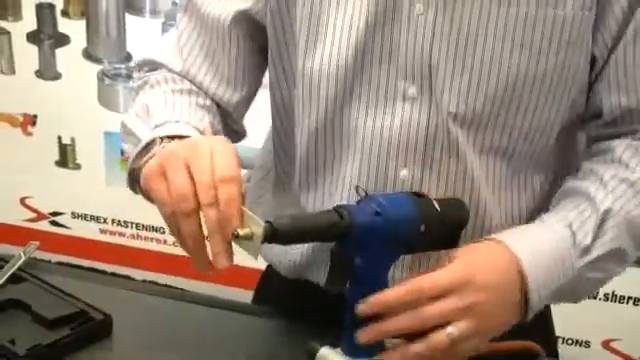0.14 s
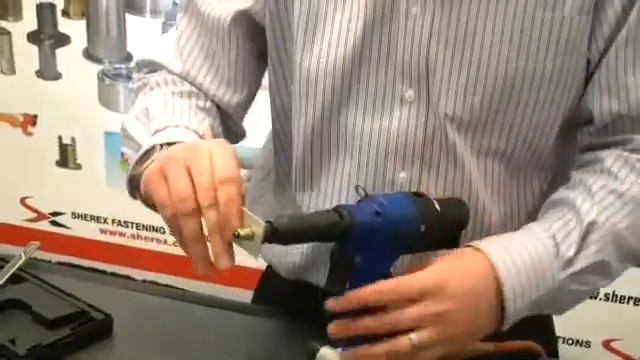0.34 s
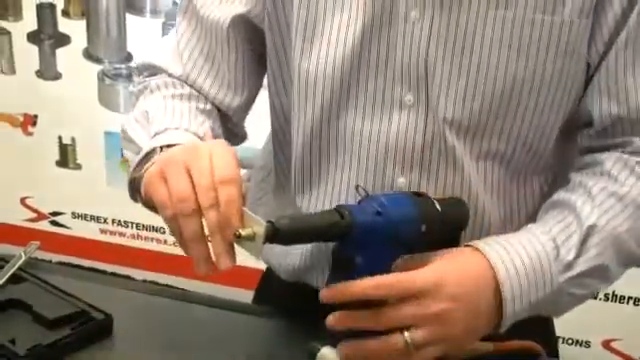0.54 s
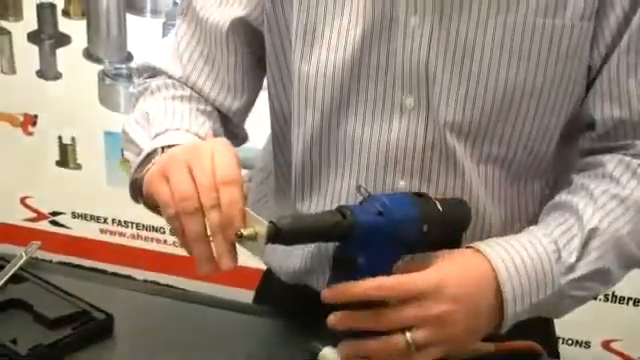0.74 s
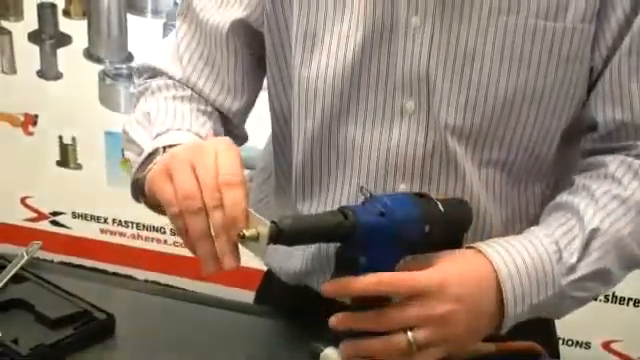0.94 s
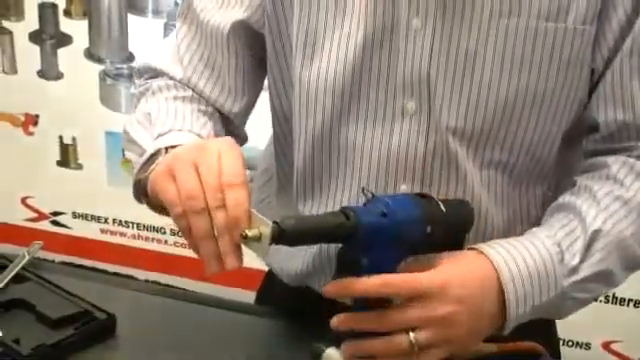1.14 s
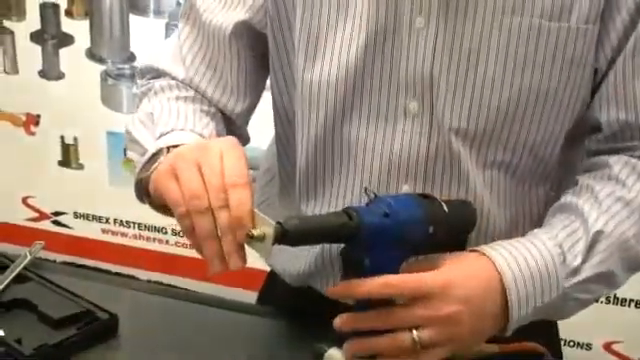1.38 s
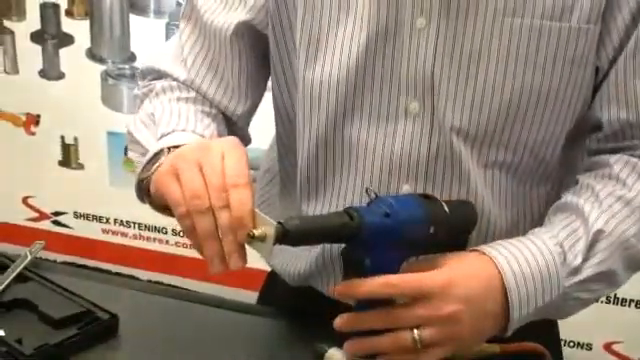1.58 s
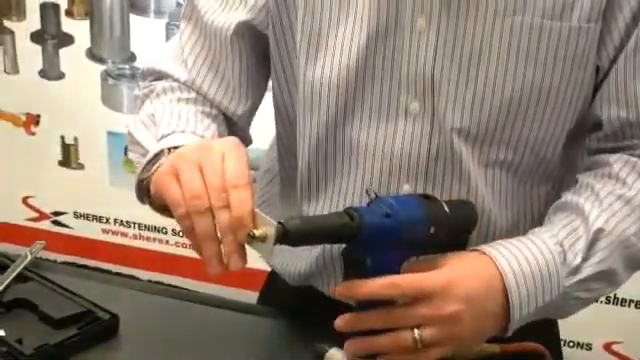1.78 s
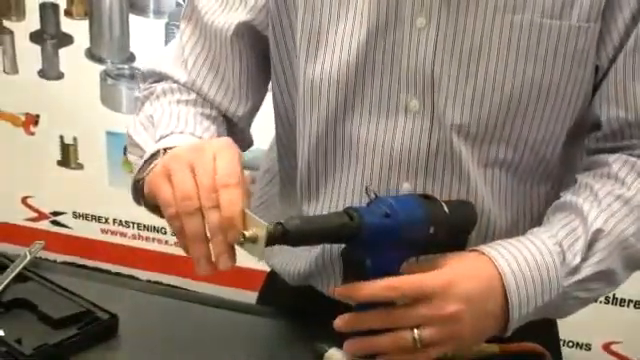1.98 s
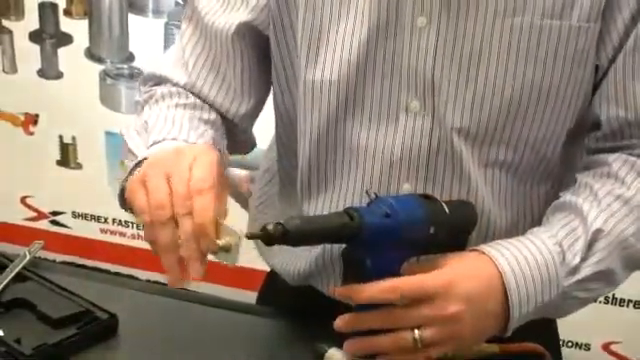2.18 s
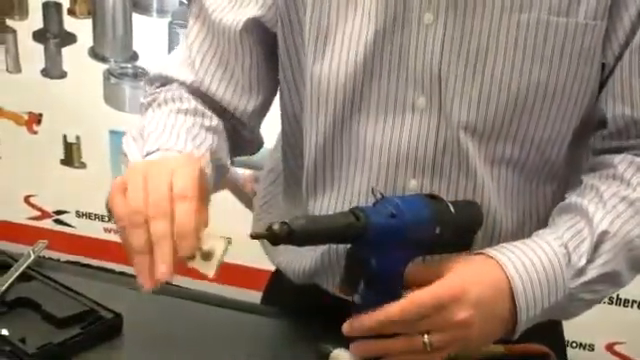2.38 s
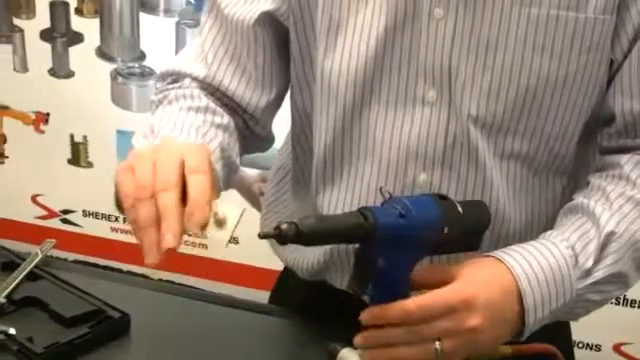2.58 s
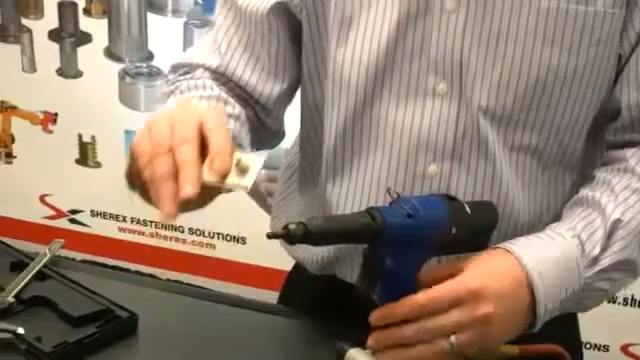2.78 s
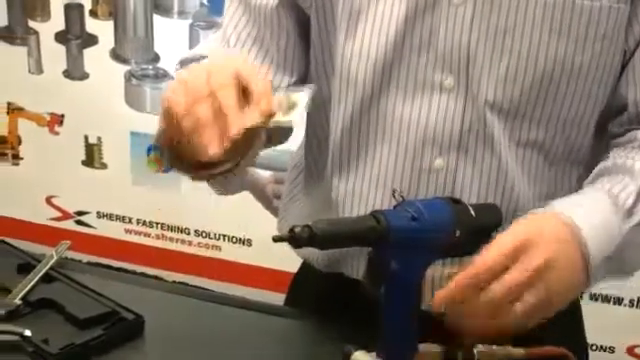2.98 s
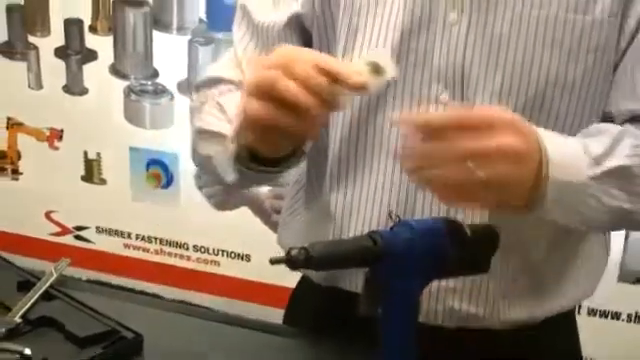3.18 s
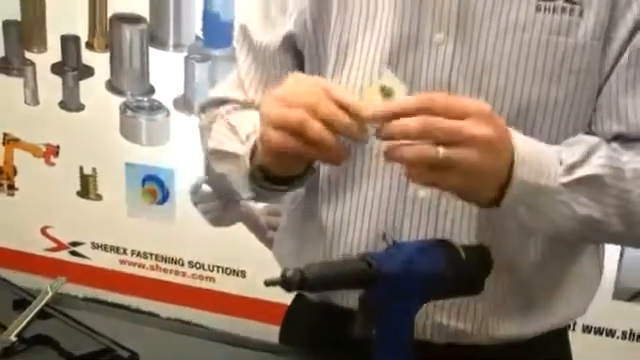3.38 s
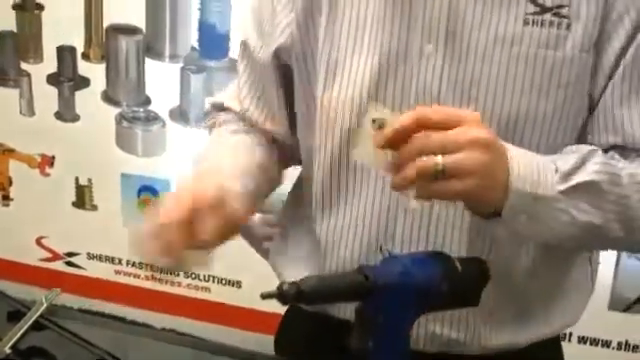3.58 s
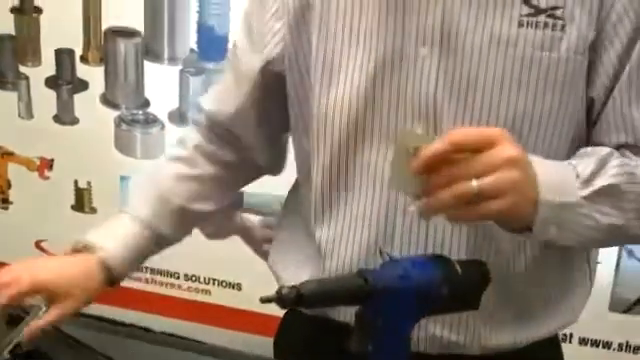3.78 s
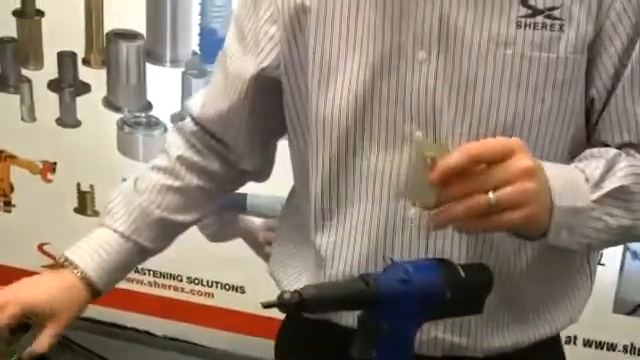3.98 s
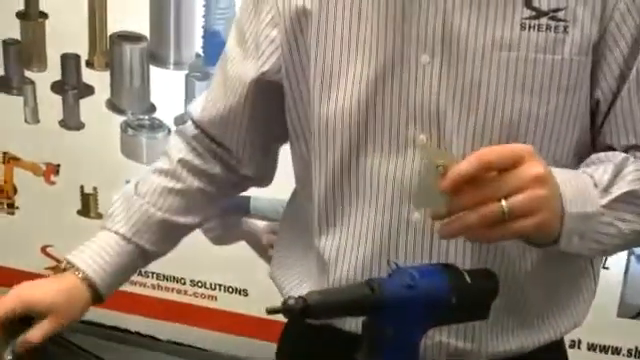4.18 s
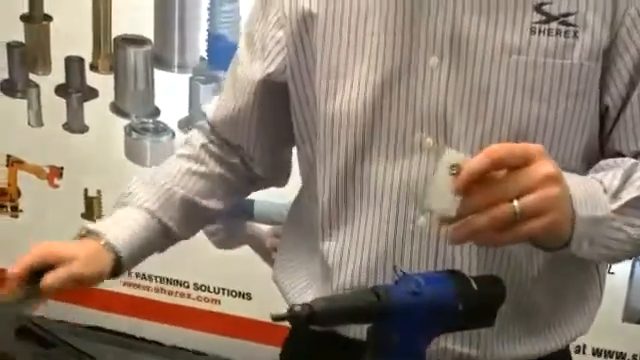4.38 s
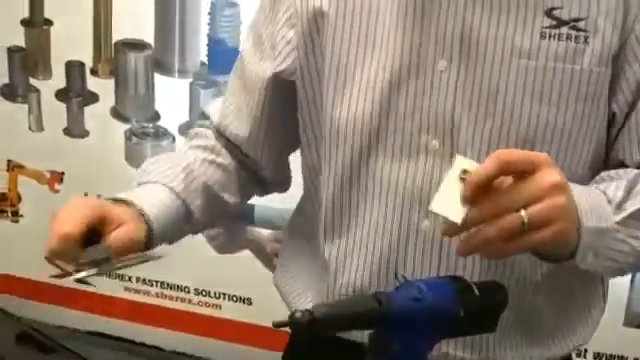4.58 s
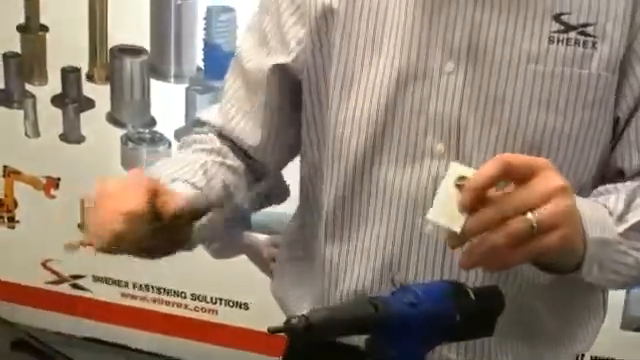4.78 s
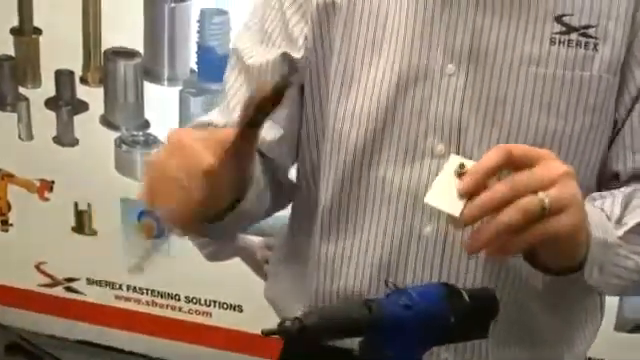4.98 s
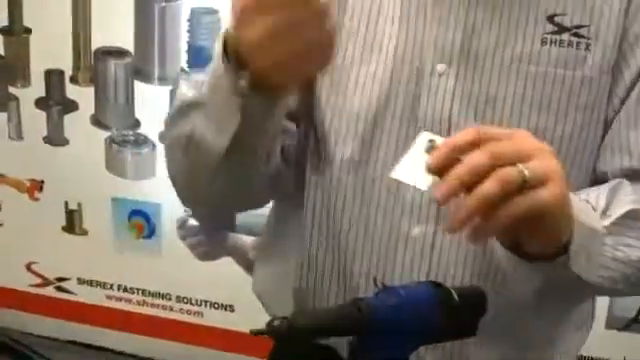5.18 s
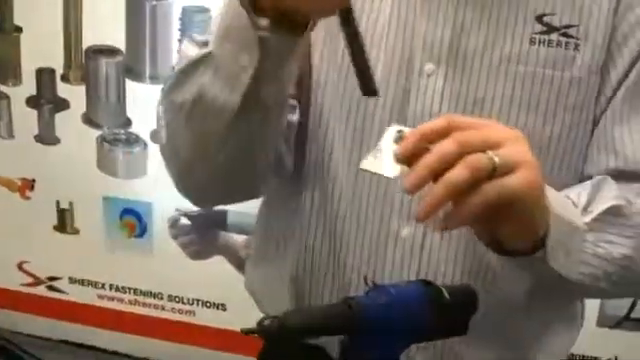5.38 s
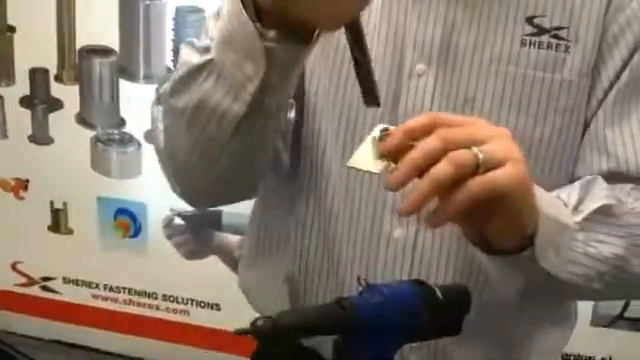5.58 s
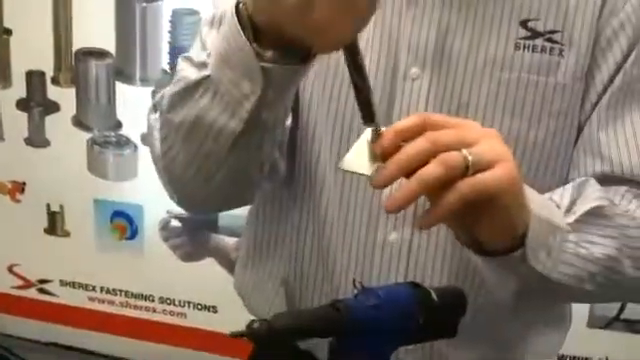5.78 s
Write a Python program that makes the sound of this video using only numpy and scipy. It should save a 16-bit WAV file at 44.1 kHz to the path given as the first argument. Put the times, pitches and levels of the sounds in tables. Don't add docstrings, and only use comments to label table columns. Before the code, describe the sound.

An air-powered rivet tool thumps, hisses and whines half a second, stops with a knock, then a steel caliper clatters from its plastic case.

```python
import sys
import numpy as np
from scipy import signal
from scipy.fft import rfft, irfft, next_fast_len
from scipy.io import wavfile
from scipy.ndimage import uniform_filter1d

SR = 44100
rng = np.random.default_rng(int(sys.argv[2]) if len(sys.argv) > 2 else 0)


def generate_wav(signal):
    frames = np.transpose(np.atleast_2d(signal))
    scaled = np.clip(frames, -1, 1) * 32767
    pcm = np.round(scaled).astype(np.int16)
    wavfile.write(sys.argv[1], SR, pcm)


def makeup_ratio(level_db):
    decades = np.asarray(level_db, float) / 20
    return 10 ** decades


N = 257543
T = np.arange(N) / SR
SIDES = np.array([[1], [-1]])

# time in seconds, rate in Hz.
VANE_SPEED = [
    (1.858, 340),
    (1.873, 640),
    (1.882, 714),
    (1.892, 736),
    (1.908, 745),
    (1.922, 766),
    (1.962, 788),
    (2.344, 790.5),
    (2.364, 690),
]
# multiple, level in dB at full speed,
# gain with speed in dB per octave, sag in dB per second.
ORDER_1 = (1, -22, 10, 5)
ORDER_2 = (2, -18.5, 20, 0)
ORDER_3 = (3, -20.5, 55, 8)
ORDER_5 = (5, -28.5, 45, 3)
# multiple, level in dB against the fifth.
UPPER_ORDERS = [(4, -6.5), (7, -11.5), (8, -14.5), (10, -15), (11, -13.5), (12, -8.5)]
# cycles per spindle turn, level in dB.
PLANET_GEARS = (4, -50)
# opens, is fullest and shuts in seconds, level in dB, fall in dB per second.
EXHAUST = (1.86, 1.862, 2.352, -24, 4)
# time in seconds, peak in dB, rise in seconds, seconds to fall 60 dB.
EXHAUST_SURGE = [
    (1.865, -23, .02, .3),
    (2.349, -20, .07, .07),
]
# frequency in Hz, level in dB per Hz.
EXHAUST_JET = [(60, -27.5), (150, -5), (350, -14.5), (600, -11), (1200, -9.5), (1900, -11.5), (2900, 1.5),
               (3900, 0.5), (4400, -7), (5600, -4), (6400, 0.5), (7200, -5), (9000, -0.5), (10400, -4.5)]
# frequency in Hz, width in Hz, level over
# the jet in dB.
EXHAUST_BANDS = [(380, 120, -6), (1710, 70, -12), (2560, 90, -16), (3400, 120, -8), (4170, 110, -16),
                 (4450, 200, 4), (4700, 80, -9), (5150, 230, -17), (6900, 150, -7), (8400, 200, 4),
                 (9400, 200, 4)]


def motor():
    vanes_per_rotor_turn, vanes_per_spindle_turn = 5, 23.15
    freest_s = 2.129
    speed = np.interp(T, *np.transpose(VANE_SPEED))
    phase = 2 * np.pi * np.cumsum(speed) / SR
    spindle = (phase - np.interp(freest_s, T, phase)) / vanes_per_spindle_turn + .3 * walk(18)
    phase = phase + .22 * np.sin(spindle)
    phase = phase + .1 * walk(99)
    rotor = 1 + 0.047 * np.cos(phase / vanes_per_rotor_turn)

    def order(k, db, depth, lag):
        beat = 1 + np.clip(depth, 0, .9) * np.cos(spindle + lag)
        blur = .035 * k * k * walk(110)
        return makeup_ratio(db + 1.2 * walk(70)) * beat * np.sqrt(2) * np.sin(k * phase + blur)

    high = order(5, .1, 0.3, 3.1)
    for k, db in UPPER_ORDERS:
        high = high + order(k, db, .3, 0.84 * k)
    stack = order(1, 1.5, 0.11, .3) * whine(speed, *ORDER_1)
    stack = stack + order(2, 1.5, .08, 3.1) * whine(speed, *ORDER_2)
    stack = stack + order(3, 1.5, 0.38, 3.3) * whine(speed, *ORDER_3)
    stack = stack + high * whine(speed, *ORDER_5)

    puffs = (1 + .35 * np.cos(phase)) * makeup_ratio(3.5) * jet(EXHAUST_JET)
    puffs = colour(puffs, [(20, 0), (20000, 0)], EXHAUST_BANDS)
    puffs = puffs * (valve(*EXHAUST) + swells(EXHAUST_SURGE))
    per_turn, gear_db = PLANET_GEARS
    gears = makeup_ratio(gear_db + 3 * walk(30)) * np.sin(per_turn * spindle)
    gears = gears * door(VANE_SPEED[1][0], VANE_SPEED[-2][0])
    return gears + stack * rotor + puffs


# frequency in Hz, width in Hz, level in
# dB.
WHINE_BANDS = [(766, 20, -4), (1480, 36, -9), (2215, 90, 9), (3720, 220, 10)]


def whine(speed, k, db, gain_db, sag_db):
    cut_db_s = 350
    bands_db = resonances(k * speed, WHINE_BANDS)
    (start, _), (free, top), (stop, _) = VANE_SPEED[0], VANE_SPEED[-3], VANE_SPEED[-1]
    speed_db = gain_db * np.log2(speed / top)
    sagged_db = sag_db * np.maximum(T - free, 0)
    cut_db = cut_db_s * k * np.maximum(T - VANE_SPEED[-2][0], 0)
    return makeup_ratio(db + speed_db - sagged_db + bands_db - cut_db) * door(start, stop)


# opens, is fullest and shuts in seconds, level in dB, fall in dB per second.
FILL = (1.288, 1.409, 1.52, -26, 35)
VENT = (1.522, 1.57, 1.865, -20.5, 11)
BLEED = (2.37, 2.384, 2.578, -38.5, 50)
# time in seconds, peak in dB, rise in seconds, seconds to fall 60 dB.
FILL_SURGE = [
    (1.297, -29, .03, .06),
]
# frequency in Hz, level in dB per Hz.
FILL_JET = [(59, -42.5), (140, -17), (200, -4.5), (421, -26), (473, -19), (1950, -21), (2250, -12),
            (4170, -5.5), (4690, -10.5), (6400, -5.5), (10400, -9.5), (13500, -45), (22000, -120)]
VENT_JET = [(59, -56), (100, -26.5), (194, -18), (347, -27), (621, -25.5), (1090, -8.5), (1380, -17),
            (2830, -3.5), (3240, -11.5), (3500, -4.5), (4970, -10.5), (6400, -3), (7190, -7), (9440, -2.5),
            (10400, -7.5), (13500, -36), (22000, -120)]
BLEED_JET = [(300, -24.5), (1500, -1.5), (4000, 0), (7300, 0.5), (10400, -1)]
# frequency in Hz, width in Hz, level over the jet in dB.
FILL_PORTS = [(6530, 60, 17), (5140, 80, 9.5), (4020, 100, 1.5), (6100, 360, 5.5), (7200, 150, 3)]
VENT_PORTS = [(1090, 150, 2.2), (2840, 120, 7), (3700, 200, 5), (4900, 150, -5), (6494, 33, 7),
              (8350, 170, 5), (9400, 200, 4.1)]


def air_flow():
    fill = jet(FILL_JET, FILL_PORTS) * (valve(*FILL) + swells(FILL_SURGE))
    vent = makeup_ratio(0.5) * jet(VENT_JET, VENT_PORTS) * valve(*VENT)
    bleed = jet(BLEED_JET) * valve(*BLEED, edge_s=.008)
    return fill + vent + bleed


# time in seconds, thud in dB, thud pitch in Hz, crack in dB,
# seconds for the thud to fade 60 dB.
BLOWS = [(1.281, -16, 215, -21, .021), (1.288, -15, 200, -28, .05), (1.29, -26, 597, -40, .036),
         (1.496, -29.5, 262, -31.5, .065), (1.521, -18, 240, -18, .055), (1.857, -8.5, 282, -28, .05),
         (1.8635, -8, 470, -30.5, .032), (1.87, -13, 956, -20, .056), (2.345, -20.5, 239.5, -19, .078),
         (2.354, -33, 300, -22, .065), (2.577, -41, 300, -40, .045)]
# frequency in Hz, level in dB per Hz.
CRACK_COLOUR = [(200, -9), (1000, 2.5), (2000, -6.5), (5000, -7), (10400, -9.5)]
# frequency in Hz, level in dB, seconds to fade 60 dB.
BENCH = [(61, -34, .3), (188, -28.5, .36), (1195, -38, .12)]
# level in dB, frequency in Hz, seconds to fade 60 dB.
STEM_PING = (-17.5, 6480, .06)


def blows():
    bench_s, ping_s = 1.305, 1.289
    thud, crack = np.zeros(N), np.zeros(N)
    for s, thud_db, hz, crack_db, t60 in BLOWS:
        add(thud, s, -makeup_ratio(thud_db) * thud_ring(hz, t60))
        add(crack, s, makeup_ratio(crack_db) * burst(.75 * t60))
    for hz, db, t60 in BENCH:
        add(thud, bench_s, -makeup_ratio(db) * thud_ring(hz, t60))
    thud = signal.sosfilt(signal.butter(2, 80, "high", fs=SR, output="sos"), thud)
    db, hz, t60 = STEM_PING
    add(thud, ping_s, makeup_ratio(db) * (ring(hz, t60) + .3 * ring(hz + 150, t60)))
    return thud + makeup_ratio(9) * colour(crack, CRACK_COLOUR)


def thud_ring(hz, t60):
    return ring(hz, t60) + .4 * ring(1.4 * hz, t60)


# time in seconds, peak in dB, crack in dB, lid in dB, steel in dB.
KNOCKS = [(3.906, -24, -15, 11, 10), (3.911, -9.5, -18.5, 6, -4), (4.006, -29, -27, 7, -1),
          (4.035, -26, -20, -6, 1), (4.077, -38, -13, 7, -3), (4.105, -33, -14, 11, -11),
          (4.135, -16.5, -14, 6, -3), (4.142, -23, -13, 6, -13), (4.208, -30.5, -28, 3, 9),
          (4.247, -18, -21, -5, -2), (4.267, -34, -21, -6, 5)]
# frequency in Hz, seconds to fade 60 dB.
LID = (735, 0.065)
# frequency in Hz, level in dB, seconds to fade 60 dB.
CASE = [(275, -5, .07), (467, -5, 0.13), (577, -0.5, 0.041), (868, -14, 0.098), (1000, -18, 0.075),
        (1100, -11, 0.082), (1247, -16, 0.057), (2200, -15, 0.036), (2600, -21, 0.031)]
STEEL = [(1403, -4.5, 0.072), (1880, -6, 0.085), (2756, -26, 0.053), (3670, -12, 0.048), (4520, -15, .04),
         (5600, -29, 0.036), (7750, -28, .05)]
# time in seconds, peak in dB, rise in seconds, seconds to fall 60 dB.
SCRAPE = [
    (3.92, -33, .04, .25),
    (4.036, -37, .22, .35),
    (4.09, -42, .3, .15),
    (4.145, -35, .04, .22),
    (4.212, -38, .06, .09),
    (4.25, -39, .04, .22),
]
# frequency in Hz, level in dB per Hz.
SCRAPE_COLOUR = [(120, -37), (200, -2), (387, -7), (738, -5.5), (946, -4.5), (1690, -9), (1860, -12.5),
                 (2770, -14.5), (5190, -28), (10400, -31), (13500, -57), (22000, -120)]


def caliper():
    grip, grip_per_db = .8, .015
    steel_grip = .7
    out, crack = np.zeros(N), np.zeros(N)
    push = 1 - np.exp(-np.arange(8192) / SR / 0.00077)
    chance = rng.standard_normal((len(KNOCKS), 3, len(CASE + STEEL) + 1))
    for (s, db, crack_db, lid_db, steel_db), (size, tune, turn) in zip(KNOCKS, chance):
        scale = grip - grip_per_db * (db + 10)
        lid_hz, lid_t60 = LID
        jaws = [(hz, g + steel_db, steel_grip * t60) for hz, g, t60 in STEEL]
        modes = [(lid_hz, lid_db, lid_t60)] + CASE + jaws
        body = 0
        for (hz, g, t60), a, b, c in zip(modes, size, tune, turn):
            body = body + makeup_ratio(g + 2 * a) * ring(hz * (1 + 0.011 * b), scale * t60, 2 * c)
        add(out, s, makeup_ratio(db - 12) * body * push)
        add(crack, s, makeup_ratio(db + crack_db) * burst(0.037 * scale))
    crack = colour(crack, [(300, -17), (1500, 16.0), (5000, -0.5), (10400, -3.5)])
    case_tones = [(720, 60, 8.3), (1680, 69, 6), (2800, 130, 3.7)]  # Hz, width Hz, dB
    scrape = jet(SCRAPE_COLOUR, case_tones, flicker_db=2.5, rate=220) * swells(SCRAPE)
    return out + crack + makeup_ratio(-2.5) * scrape


# time in seconds, peak in dB,
# centre in Hz, seconds to fade 60 dB, left minus right in dB.
TICKS = [(.3493, -39, 2950, .026, .1), (.3785, -50.5, 2100, .04, 2), (.5078, -30, 2300, .014, -.4),
         (.508, -33, 5200, .014, -3), (.5266, -42, 1500, .0078, 2), (.607, -35, 2400, .014, .1),
         (.6079, -31, 3250, .016, .1), (.8244, -32, 3500, .021, -1), (.826, -38.5, 1190, .016, 3),
         (1.1494, -51.5, 1500, .06, 3), (2.9522, -44.5, 1750, .061, .5), (2.955, -45, 450, .13, -1.1)]
TAPS = [
    (3.3987, -47.5, 8650, .01, 2.7),
    (4.8763, -44, 8500, .013, -1.4),
    (5.1, -48, 8500, .025, -.4),
    (5.0913, -49.5, 1900, .037, -.4),
    (5.452, -45, 1100, .1, -6.5),
    (5.5199, -50, 1110, .04, -3),
    (5.5872, -51.5, 1090, .045, -3),
]


def ticks():
    out = np.zeros((2, N))
    for s, db, hz, t60, pan_db in TICKS + TAPS:
        second_hz = hz * (1.27 if s < TAPS[0][0] else .7)
        hit = burst(t60) * min(12 * t60, 1)
        hit[0] = 1.5
        tick = signal.lfilter(*signal.iirpeak(hz, 7.5, SR), hit)
        tick = tick + 0.46 * signal.lfilter(*signal.iirpeak(second_hz, 8., SR), hit)
        tick = tick + .02 * hit
        add(out, s, makeup_ratio(db) * tick / np.abs(tick).max() * makeup_ratio(pan_db * SIDES / 2))
    return out


# time in seconds, peak in dB, rise in seconds, seconds to fall 60 dB.
RUSTLE = [
    (1.2, -60, .55, .3),
    (3.5, -61, 2.8, 1),
    (4.3, -58, .2, 1.5),
    (4.6, -56, .19, .22),
    (4.9, -67, 2.5, 1.4),
    (5.11, -61, .2, 1.5),
    (5.3, -57, 1.8, 2.2),
    (5.46, -58, .6, .5),
]
# frequency in Hz, level in dB per Hz.
CLOTH = [(500, 2), (1200, 1), (3000, -8), (6000, -13), (10400, -10)]


def sleeves():
    return jet(CLOTH, flicker_db=3.5, rate=59) * swells(RUSTLE)


def room(x):
    early_db, early_t60, late_db, late_t60 = -8, 0.11, -22, .52
    t = np.arange(SR) / SR
    a, b, c, d = rng.standard_normal((4, SR))
    apart = [(100, -16.5), (500, -11), (2000, -5), (10000, 0.0)]
    early = (a + colour(b, apart) * SIDES) * makeup_ratio(-60 * t / early_t60)
    dull = [(100, -4.5), (800, 1.5), (1500, -5), (2400, -9), (4000, -5.5), (10000, -16)]
    late = colour(c + .4 * d * SIDES, dull) * makeup_ratio(-60 * t / late_t60)
    echo = makeup_ratio(early_db) * early / np.linalg.norm(early[0])
    echo = echo + makeup_ratio(late_db) * late / np.linalg.norm(late[0])
    echo = np.pad(echo, ((0, 0), (130, 0)))
    return x + signal.fftconvolve(x, echo, axes=1)[:, :N]


# frequency in Hz, level in dB per Hz.
AIR = [(12, -48.5), (20, -16.5), (47, -16), (80, -6.5), (100, -13), (122, -4.5), (146, -9.5), (195, -8.5),
       (247, -9), (281, -11), (347, -15), (487, -17.5), (585, -20.5), (987, -27.5), (1540, -31),
       (10400, -40), (13500, -68), (22000, -120)]
# frequency in Hz, width in Hz, level in dB.
HUM = [(120, 5.2, -57.5), (240, 8, -68.5)]
# time in seconds, depth in dB, attack in seconds, recovery in seconds.
DUCK = (2.62, 2.2, .05, .2)


def showroom():
    air_db, room_db = -50, .8
    mid = level(colour(rng.standard_normal(N), AIR), air_db - 4.0) * makeup_ratio(1.2 * walk(5))
    side = level(colour(rng.standard_normal(N), AIR), air_db)
    side = colour(side, [(100, -19), (500, -6), (3000, -3), (10000, -6.5)])
    hum = np.zeros(N)
    for hz, width, db in HUM:
        strength = makeup_ratio(db + 1.5 * walk(width)) * np.sqrt(2)
        hum += strength * np.sin(2 * np.pi * hz * T + 1.5 * walk(width))
    s, depth_db, attack, recovery = DUCK
    duck_db = depth_db * np.exp(-np.abs(T - s) / np.where(T < s, attack, recovery))
    return (mid + hum + side * SIDES) * makeup_ratio(room_db - duck_db)


def jet(points, ports=(), flicker_db=0.9, rate=40):
    noise = colour(rng.standard_normal(N), points, ports)
    return level(noise, 0) * makeup_ratio(flicker_db * walk(rate))


def door(opens, shuts, edge_s=.002):
    return np.clip(np.minimum(T - opens, shuts - T) / edge_s + 1, 0, 1)


def valve(opens, fullest, shuts, db, fall_db_s, edge_s=.002):
    late = T - fullest
    slope = np.where(late < 0, -55, fall_db_s)
    return makeup_ratio(db - slope * late) * door(opens, shuts, edge_s)


def swells(rows):
    power = np.zeros(N)
    for s, db, rise, fall in rows:
        power += makeup_ratio(db - 60 * np.abs(T - s) / np.where(T < s, rise, fall)) ** 2
    return np.sqrt(power)


def ring(hz, t60, phase=0., length=8192):
    t = np.arange(length) / SR
    return np.sin(2 * np.pi * hz * t + phase) * np.exp(-np.log(1000) * t / t60)


def burst(t60, length=8192):
    return rng.standard_normal(length) * np.exp(-np.log(1000) * np.arange(length) / SR / t60)


def walk(rate):
    k = int(SR / rate)
    steps = np.repeat(rng.standard_normal(N // k + 1), k)
    return 1.3 * uniform_filter1d(uniform_filter1d(steps, k), k)[:N]


def resonances(hz, rows):
    return sum(peak_db / (1 + (2 * (hz - f) / width) ** 2) for f, width, peak_db in rows)


def colour(x, points, ports=()):
    size = next_fast_len(x.shape[-1])
    hz = np.maximum(np.fft.rfftfreq(size, 1 / SR), 1)
    point_hz, point_db = np.transpose(points)
    db = np.interp(np.log(hz), np.log(point_hz), point_db) + resonances(hz, ports)
    return irfft(rfft(x, size) * makeup_ratio(db), size)[..., :x.shape[-1]]


def level(x, db):
    return x * makeup_ratio(db) / np.sqrt(np.mean(x ** 2))


def add(out, s, x):
    i = int(s * SR)
    out[..., i:i + x.shape[-1]] += x[..., :N - i]


def scene():
    tool = (motor() + air_flow() + blows()) * makeup_ratio(-.4 * SIDES)
    hands = caliper() * makeup_ratio(.3 * SIDES) + ticks() + makeup_ratio(-3) * sleeves()
    return room(tool + hands) + showroom()


def roll_off(x):
    return signal.sosfilt(signal.butter(12, 11630, fs=SR, output="sos"), x)


def record(dry):
    ceiling, top_hz = .92, 10195
    soft = dry / (1 + np.abs(dry / ceiling) ** 8) ** .125
    top_cut = signal.ellip(10, .2, 75, top_hz, fs=SR, output="sos")
    mix = signal.sosfilt(top_cut, soft)
    return roll_off(mix)


dry = scene()
out = record(dry)
generate_wav(out)
```